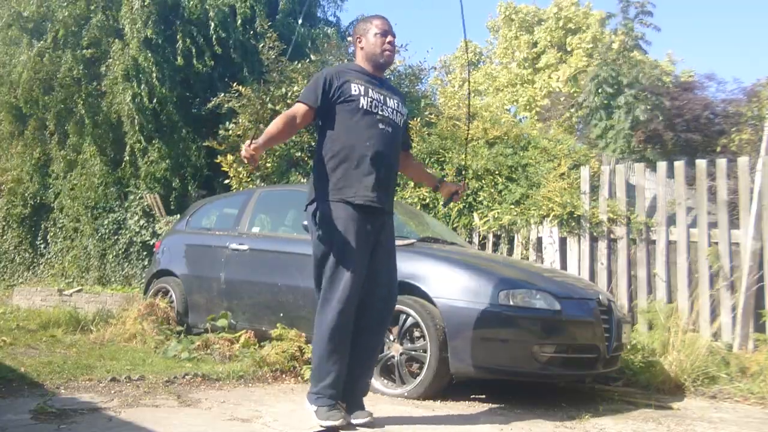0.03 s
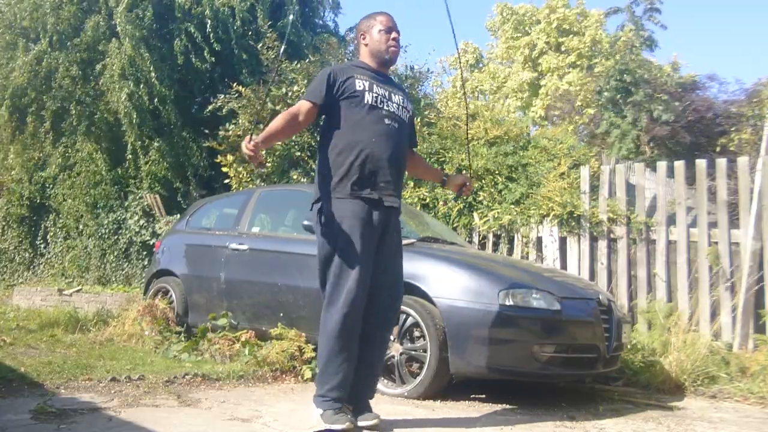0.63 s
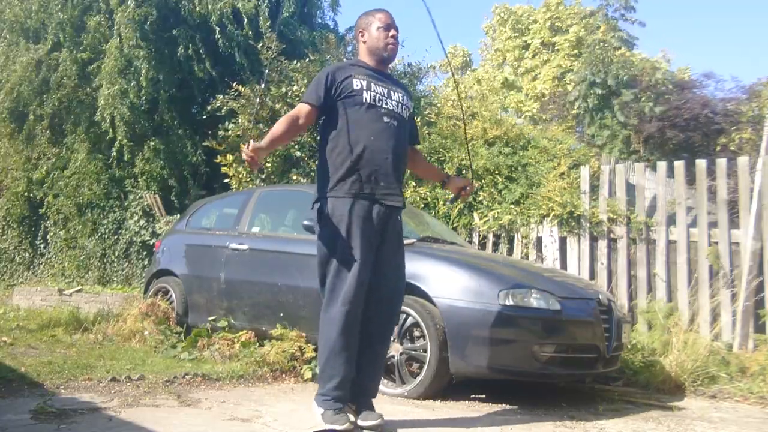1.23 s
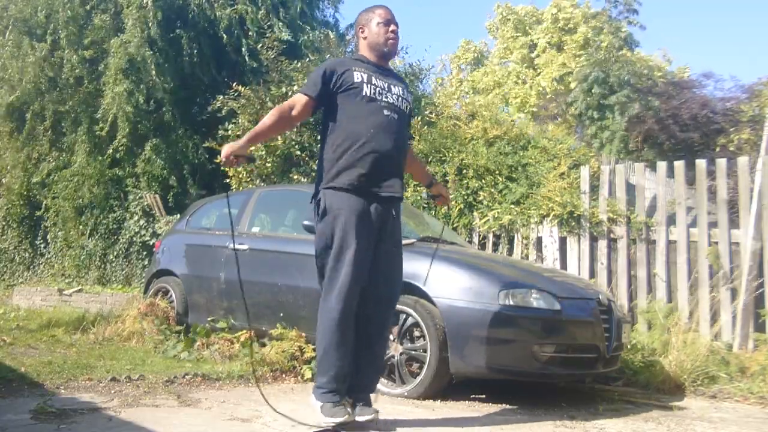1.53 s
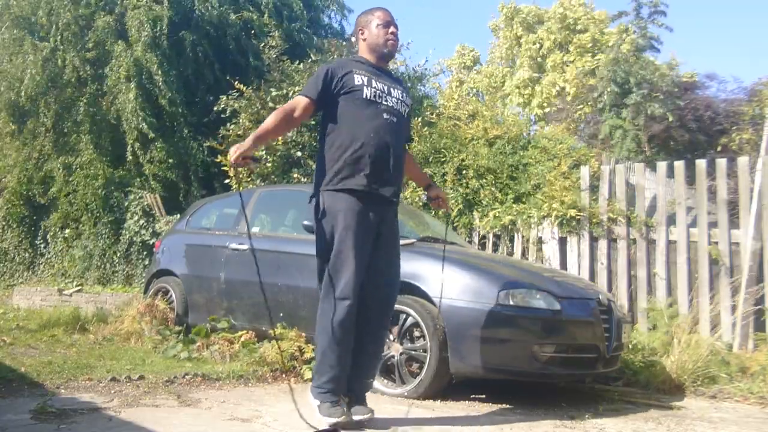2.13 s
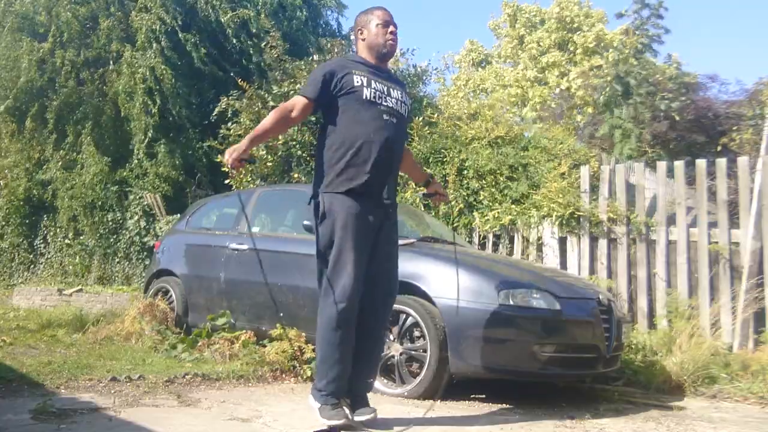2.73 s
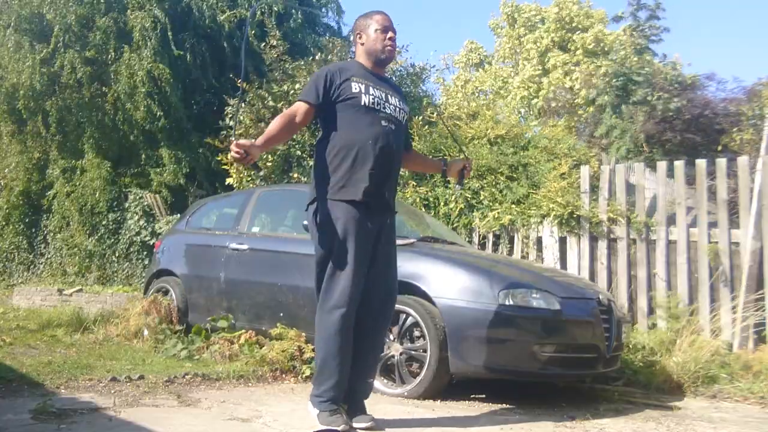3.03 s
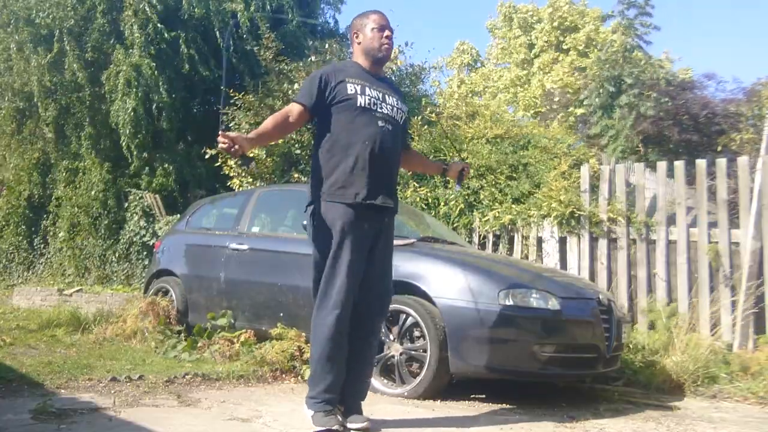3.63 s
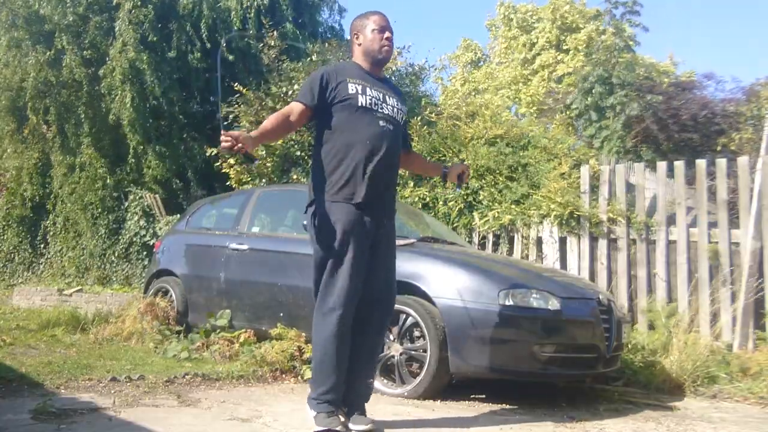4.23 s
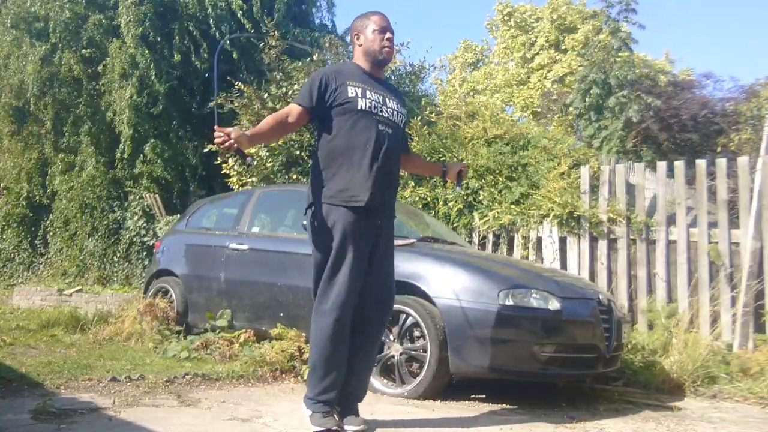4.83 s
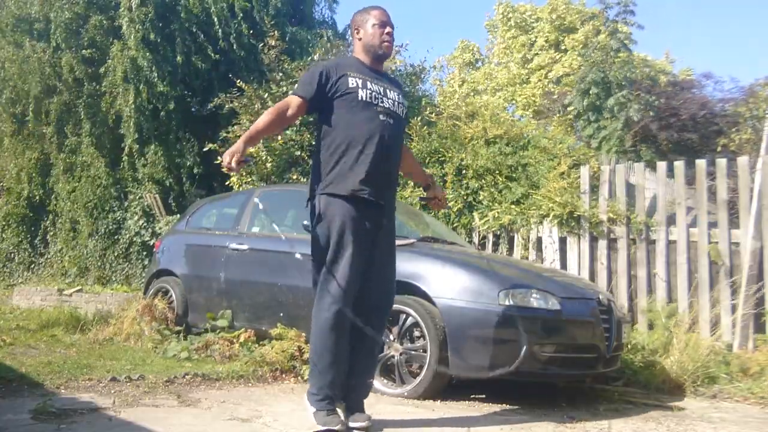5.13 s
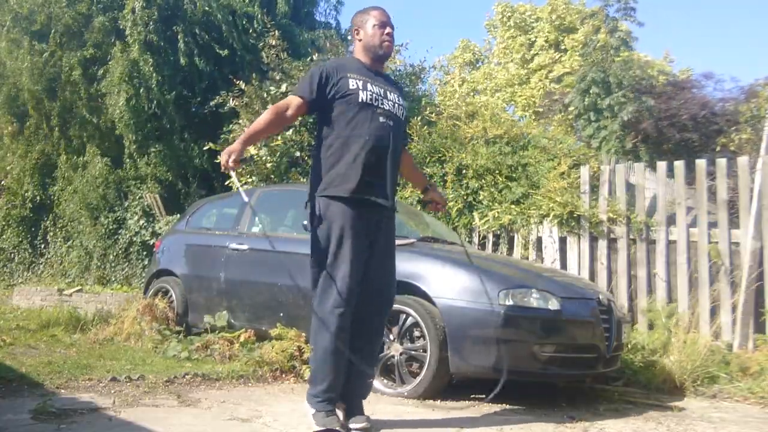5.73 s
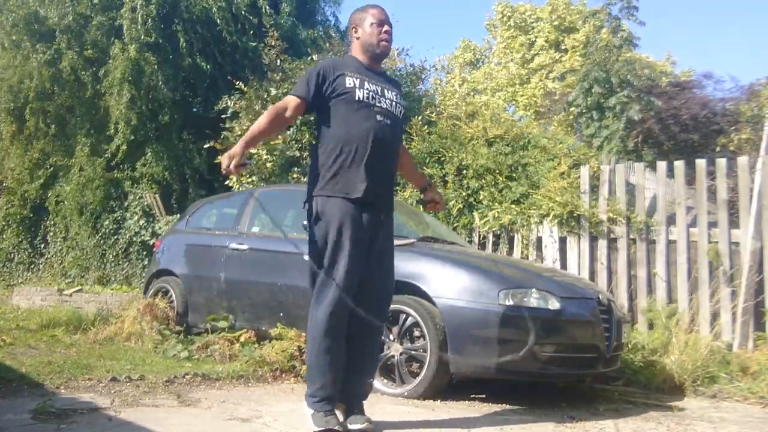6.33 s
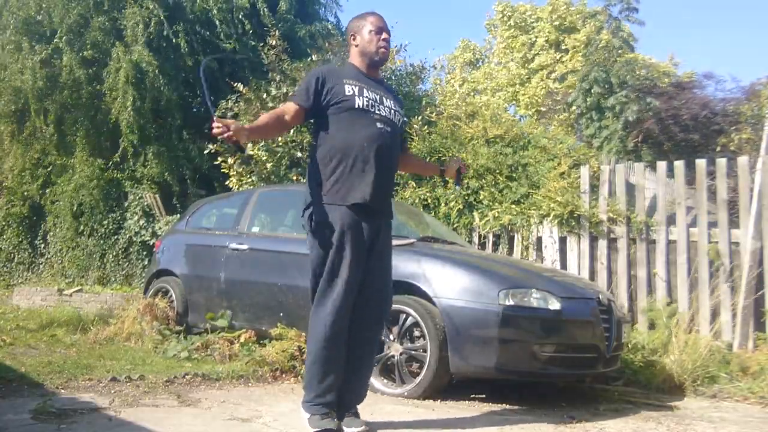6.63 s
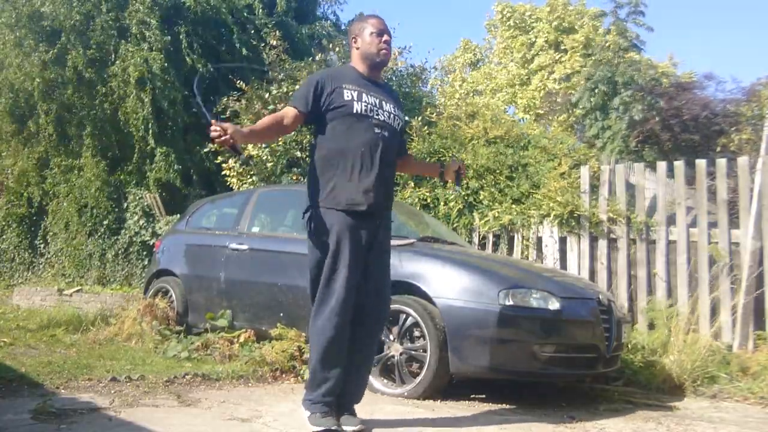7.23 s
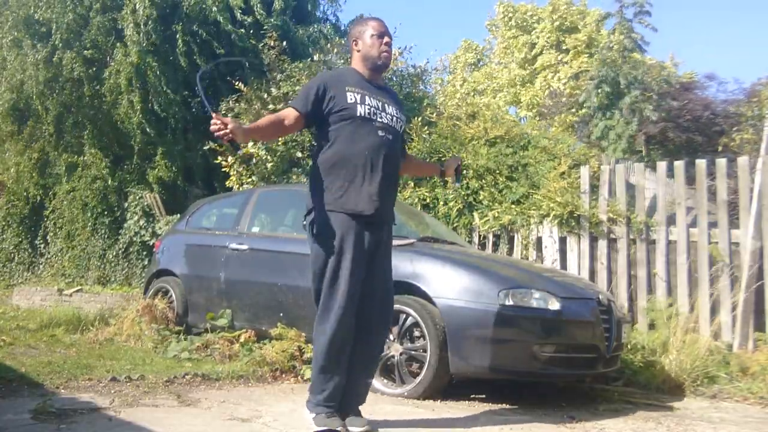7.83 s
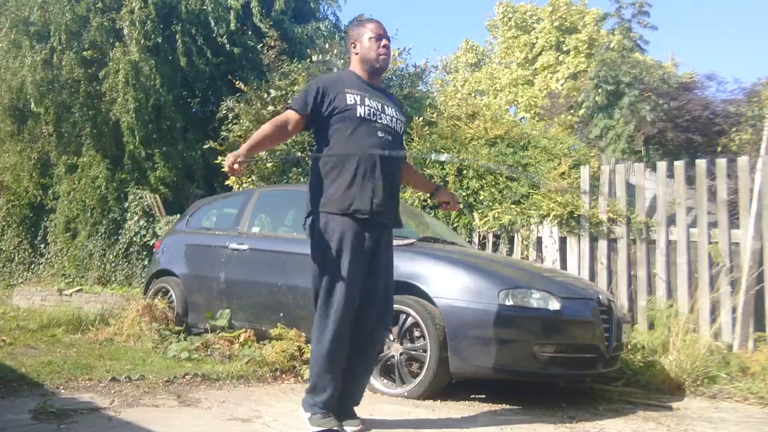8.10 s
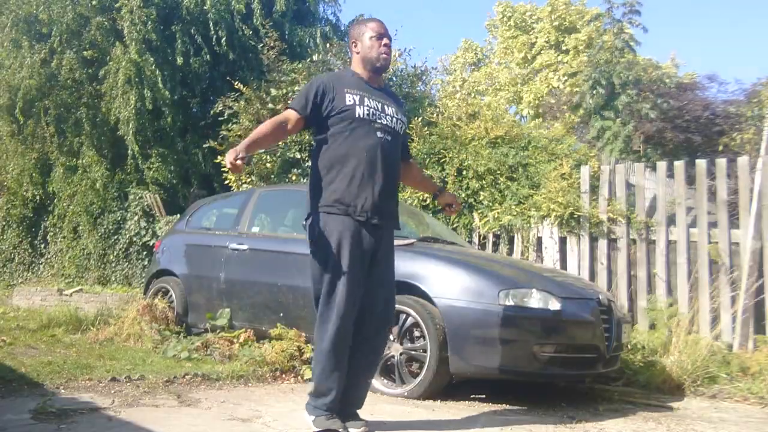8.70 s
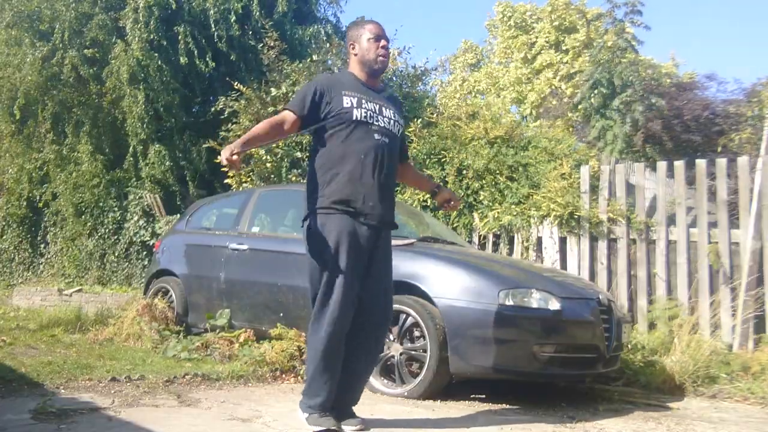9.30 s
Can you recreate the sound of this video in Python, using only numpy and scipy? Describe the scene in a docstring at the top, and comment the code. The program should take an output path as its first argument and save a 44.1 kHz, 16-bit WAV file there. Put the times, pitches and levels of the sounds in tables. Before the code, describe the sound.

A skipping rope hums and slaps paving at a steady pace outdoors, with soft shoe landings and gusts rumbling on the microphone.

```python
"""Someone skips rope on garden paving. At the start a gust buffets the microphone's right port.
From 0.56 s the cord cracks down every 0.6 s: it hums through the air, slaps, then shoes land and
push off, all echoed by walls and a fence. Near 4.5 s a handle swivel chirps and wind hits the left
port, near 6.5 s the right. From 8 s the swivel chirps on three turns as the hiss of leaves fades."""
import sys
import numpy as np
from scipy import signal
from scipy.fft import rfft, irfft
from scipy.io import wavfile

SR = 44100
rng = np.random.default_rng(int(sys.argv[2]) if len(sys.argv) > 2 else 0)


def put_to_file(sound):
    """Save the sound as 16-bit audio at rate SR, in the file named by the first command-line argument."""
    columns = np.atleast_2d(sound).T  # one column per channel
    safe = np.clip(columns, -1, 1)
    whole_steps = np.round(safe * 32767)
    wavfile.write(sys.argv[1], SR, whole_steps.astype(np.int16))


N = 417186
TIME = np.arange(N) / SR
AGE = TIME[:SR // 4]   # s since a contact


def cord_slaps():
    """The loop's tip cracks down, flicking sand; the rest of the cord lands on the grit and skitters."""
    # strikes and rebounds: t/s, relative level/dB, sand trim/dB, laying trim/dB, crack f/Hz
    strikes = [(0.5611, -30.5, -18, -3, 2660), (1.1874, -32, -12.5, -7, 2540),
               (1.795, -27.5, -10.5, -5, 2770), (2.412, -28, -15.5, -4.5, 2740),
               (3.0477, -34.5, -21, -10, 2150), (3.656, -30, -13, -6, 2350), (4.275, -32.5, -14.5, 1, 2796),
               (4.8711, -31.5, -10, 1, 2702), (5.4747, -30.5, -13, -9, 2790),
               (6.062, -31, -12.5, 1.5, 2550), (6.6816, -34, -14, -2, 2600), (7.2949, -29, -14, 0, 2615),
               (7.3325, -44, -6.5, -15, 2715), (7.889, -33.5, -16, -4, 2620), (7.9338, -38, -14, -22, 2700),
               (8.495, -27, -17, -1, 2780), (8.5317, -48, -15, -15, 2297), (9.111, -30, -23.5, 1.5, 2748),
               (9.15, -45, -12.5, -15, 2500)]
    # spectra of tip, dragging cord and sand: f/Hz, gain/dB
    crack_spectrum = [(200, -8), (800, -8), (1400, -7), (2100, 0), (2700, 4.5), (3400, -2), (4800, -8.5),
                      (8000, -22), (16000, -58)]
    drag_spectrum = [(300, -4), (1200, -11), (2400, -17.5), (3900, 1), (4900, -2.5), (5800, -2),
                     (8000, -18), (16000, -27)]
    spray_spectrum = [(1000, -40), (3000, 2.5), (4500, 7), (6000, 10), (10500, 9), (16000, 12)]
    spectrum_peak_hz = 2700
    crack, drag, spray = np.zeros((3, 2, N))
    for s, db, sand_db, laying_db, crack_hz in strikes:
        tip = from_db(-10.5) * burst(rise_s=.002, t60_s=.0065, grain_db=-6.5)
        tip[round(.0018 * SR)] += 1   # the blow itself
        timbre = [(hz * crack_hz / spectrum_peak_hz, gain_db) for hz, gain_db in crack_spectrum]
        add(crack, s - .001, from_db(db + 21.5) * colour(wall_echoes(tip), timbre))
        skitter = from_db(-20) * burst(rise_s=.04, t60_s=.12, grain_db=4)
        laying = from_db(laying_db) * burst(rise_s=.0011, t60_s=.065, grain_db=3.5)
        add(drag, s + .001056, from_db(db + 21) * wall_echoes(laying + skitter))
        sand = tip + from_db(-3) * burst(rise_s=.0046, t60_s=.032, grain_db=10)
        add(spray, s - .0009, from_db(db + sand_db + 24.5) * wall_echoes(sand))
    return crack + colour(drag, drag_spectrum) + colour(spray, spray_spectrum)


def cord_whirl():
    """The cord swishes over the head, down to the ground and up behind the heels."""
    # turns: ground t/s, overhead level/dB, downswing level/dB, f/Hz, upswing level/dB, f/Hz
    turns = [(-.05, -52, -41, 299.4, -50, 290), (.561, -54.5, -46.5, 312.4, -47, 297.3),
             (1.187, -51.5, -47.5, 298, -45.5, 278.2), (1.795, -63, -46, 302, -42, 308.7),
             (2.411, -54.5, -47.5, 330.3, -48, 305), (3.047, -54.5, -43.5, 295, -48, 284.7),
             (3.656, -48.5, -45.5, 342, -44.5, 311.9), (4.275, -54.5, -45, 315.3, -48, 318.7),
             (4.871, -55, -46, 333.5, -44, 320), (5.474, -53.5, -46.5, 291.8, -42.5, 290),
             (6.062, -50, -48, 297.5, -41.5, 313), (6.681, -58, -48.5, 295, -45, 284.6),
             (7.295, -60, -48, 298.4, -45, 310.5), (7.889, -54, -50.5, 291.6, -44, 305),
             (8.495, -50.5, -50.5, 272.6, -41.5, 317), (9.109, -53, -48.5, 270, -44.5, 301)]
    # stroke shapes: fastest t re ground/s, build/s, die/s, width of pitch rise re swell
    overhead = (-.178, .06, .05, .8)
    downswing = (0.016, .115, .085, .52)
    upswing = (.122, .03, 0.05, .7)
    ground_s, over_db, down_db, down_hz, up_db, up_hz = np.transpose(turns)
    over_hz = np.full(len(turns), 267)
    strokes = [surge(ground_s, over_db, over_hz, overhead),
               surge(ground_s, down_db, down_hz, downswing),
               surge(ground_s, up_db, up_hz, upswing)]
    return sum(eddy_tone(pitch_hz, gain) for pitch_hz, gain in strokes)


def surge(ground_s, db, peak_hz, shape, coasting_hz=230.3):
    """One stroke of every turn: pitch and gain rise and sink with the cord's speed."""
    offset_s, build_s, die_s, pitch_share = shape
    fastest_s = ground_s + offset_s
    turn = np.searchsorted((fastest_s[:-1] + fastest_s[1:]) / 2, TIME)
    since_s = TIME - fastest_s[turn]
    away = since_s / np.where(since_s < 0, build_s, die_s)
    pitch_hz = coasting_hz + (peak_hz[turn] - coasting_hz) / (1 + (away / pitch_share) ** 2)
    return pitch_hz, from_db(db)[turn] * np.exp(-away ** 2)


def eddy_tone(pitch_hz, gain):
    """Eddies peel off the cord: a wavering tone from the tip, a wider band from the slower sides."""
    phase = 2 * np.pi * np.cumsum(pitch_hz * (1 + .01843 * drift(rate_hz=14))) / SR
    sine, cosine = np.sin(phase), np.cos(phase)
    tip = sine * from_db(2.4 * drift(rate_hz=15.7))
    sides = drift(rate_hz=45) * sine + drift(rate_hz=43.3) * cosine
    turbulence = from_db(-2.5 + 6 * (np.clip(pitch_hz, 220, 340) / 270 - 1))   # grows with speed
    hum = gain * rms_one(tip + turbulence * sides)
    reflections = drift(rate_hz=30) * cosine * gain * from_db(-18.5)
    return hum * from_db([[1], [-1]]) + reflections * [[1], [-1]]


def shoes():
    """Soles pat the paving and crunch grit, on landing and again on push-off."""
    # footfalls: t/s, relative level/dB, thud trim/dB
    footfalls = [(0.0559, -40, -9), (0.3555, -46, -0.5), (0.6789, -39.5, -8), (0.9623, -48.5, -0.5),
                 (1.2795, -39, -5.5), (1.5831, -41, -14), (1.9057, -42.5, -1), (2.1915, -46, -11),
                 (2.5076, -38.5, -5), (2.8051, -50, 5), (3.1242, -42.5, -6), (3.414, -46, -5.5),
                 (3.735, -40, -4.5), (4.0124, -44, -16), (4.343, -38, -4), (4.6319, -46.5, -1),
                 (4.9558, -37, -10), (5.2393, -43, -5), (5.5676, -45.5, 0), (5.8446, -43, -10),
                 (6.1592, -41.5, -3.5), (6.7643, -40, -7.5), (7.05, -45.5, -19), (7.3761, -40, -4.5),
                 (7.668, -45.5, 1), (7.996, -42, -12), (8.2874, -46.5, -1.5), (8.6021, -44, 1.5),
                 (8.8954, -49.5, 0), (9.2067, -41.5, -3.5)]
    # spectra of grit and sole: f/Hz, gain/dB
    grit_spectrum = [(60, -11.5), (300, 4.5), (1000, 1.5), (2000, -1), (3500, -5.5), (5000, -12.5),
                     (16000, -19.5)]
    sole_spectrum = [(40, -15), (120, -15), (250, -9), (420, -0.5), (560, -0.5), (900, -9), (1500, -31.5),
                     (4000, -67)]
    grit, sole = np.zeros((2, 2, N))
    for s, db, thud_db in footfalls:
        crunch = burst(rise_s=.00055, t60_s=.026, grain_db=.5)
        crunch[round(.0005 * SR)] += from_db(-1.5)
        add(grit, s, from_db(db + 21.5) * wall_echoes(crunch))
        pat = burst(rise_s=.0008, t60_s=.051, grain_db=2)
        pat[round(.001 * SR)] += 1
        add(sole, s, from_db(db + thud_db + 36) * wall_echoes(pat))
    return colour(grit, grit_spectrum) + colour(sole, sole_spectrum)


def swivels():
    """A handle's bearing rubs briefly and rings very high."""
    # rubs: t/s, level/dB
    chirps = [(4.435, -45.5), (8.015, -44), (8.622, -49), (9.233, -44)]
    # bearing modes: f/Hz, level/dB, t60/s
    modes = [(9300, -5, .006), (10950, -3, 0.0092)]
    rubs = np.zeros(N)
    for s, db in chirps:
        add(rubs, s, from_db(db) * burst(rise_s=.004, t60_s=.043, grain_db=14))
    ring = sum(from_db(db - 60 * AGE / t60_s) * np.sin(2 * np.pi * hz * AGE) for hz, db, t60_s in modes)
    return signal.oaconvolve(rubs, ring)[:N]


def wind():
    """Each port has its own lumpy rumble; strong eddies thump on it and break up into flutter."""
    # eddy hits: t/s, relative level/dB, flutter trim/dB, left-right/dB
    buffets = [(0.055, -21, -12.5, -26), (.106, -20, -19, -29), (.149, -13.5, -11, -40),
               (.164, -14.5, -10, -42), (.184, -27, -2.5, -38), (.207, -22.5, -22, -35),
               (.262, -23, -11.5, -36), (.334, -26.5, -24, -37), (3.796, -32.5, -39, -5),
               (4.527, -15, -21.5, 43), (4.547, -17.5, -6.5, 42), (6.335, -29.5, -10.5, -23),
               (6.410, -16.5, -28.5, -34), (6.457, -15.5, -3, -30), (6.477, -32, -3.5, -32),
               (6.521, -20, -27, -24), (6.545, -22.5, -11.5, -29), (6.557, -16, -34, -28),
               (6.609, -23, -12.5, -29), (6.764, -21.5, -20, -25), (7.093, -30, -28, -15)]
    # spectra of wind on a port: f/Hz, gain/dB
    rumble_spectrum = [(20, -25), (50, -2), (100, 3), (180, -7), (300, -9), (500, -29), (1000, -42),
                       (2500, -79)]
    thump_spectrum = [(20, -39), (50, -6.5), (110, 4), (250, 0.5), (450, -11), (800, -26.5), (2000, -89.5)]
    flutter_spectrum = [(150, -7), (450, 7.5), (780, -1), (1100, -9.5), (1600, -25), (2200, -32.5),
                        (3000, -60)]
    lumps_db = 5 * np.array([drift(rate_hz=15.8) for port in range(2)])
    rumble = rms_one(colour(rng.standard_normal((2, N)), rumble_spectrum))
    rumble *= airflow() * from_db(lumps_db)
    thumps, flutters = np.zeros((2, 2, N))
    for s, db, flutter_db, pan_db in buffets:
        ports = at_ports(db, pan_db)
        add(thumps, s + .0012, from_db(38.5) * ports * jolts(per_s=220, t60_s=.11))
        add(flutters, s + .00053, from_db(flutter_db + 33.5) * ports * jolts(per_s=200, t60_s=.11))
    return rumble + colour(thumps, thump_spectrum) + colour(flutters, flutter_spectrum)


def airflow(breeze_db=-73.5, fall_db=14, rise_share=.49):
    """Wind strength at each port: gusts build and die over a light breeze."""
    # gusts: peak t/s, level/dB, length at fall_db below peak/s, left-right/dB
    gusts = [(0.156, -35, 0.75, -30), (0.486, -37, 0.28, 6), (0.768, -42, 0.076, -22),
             (2.145, -51, 0.35, 8), (2.597, -45, 0.2, 29), (3.357, -48.5, 0.1, 21), (4.02, -52, 0.14, -12),
             (4.401, -38, 0.083, 22), (4.55, -35.5, 0.15, 35), (4.7, -44.5, 0.14, -10),
             (4.983, -45, 0.17, -3), (5.172, -49, .12, 21), (5.979, -55, 0.28, -19),
             (6.551, -34.5, 0.91, -30.5), (7.06, -40.5, 0.44, -7), (7.4, -38.5, .25, -10),
             (7.95, -45, .55, -7), (8.335, -50, 0.23, -17), (8.705, -46, 0.23, 20), (8.924, -47, .2, -20),
             (9.21, -50, 0.38, -25)]
    power = np.full((2, N), from_db(breeze_db) ** 2)
    for s, db, length_s, pan_db in gusts:
        near = slice(*np.searchsorted(TIME, [s - 2 * length_s, s + 2 * length_s]))
        since_s = TIME[near] - s
        away = np.maximum(-since_s / rise_share, since_s / (1 - rise_share)) / length_s
        power[:, near] += (at_ports(db, pan_db) * from_db(-fall_db * away)) ** 2
    return np.sqrt(power)


def jolts(per_s, t60_s):
    """One pressure jolt, then a dying run at random moments; energy 1."""
    hits = rng.random(len(AGE)) < per_s / SR
    run = hits * rng.uniform(.26, 1, len(AGE)) * from_db(-60 * AGE / t60_s)
    run[0] = 1
    return run * rng.choice([-1, 1], len(AGE)) / np.linalg.norm(run)


def wall_echoes(sound):
    """A contact at both ports: direct path, hard echoes that vary from spot to spot, dense scatter."""
    # echoes off ground, walls and fence: delay/s, level/dB
    echoes = [(.0005, -8), (.0039, -10), (.0055, -8.5), (.0068, -24), (0.0105, -8), (0.0378, -20)]
    response = np.zeros((2, len(AGE)))
    response[0, 0] = response[1, 2] = 1   # left port first
    for port in response:
        for delay_s, db in echoes:
            port[round(abs(delay_s + rng.normal(0, .00015)) * SR)] += from_db(db)
    heard = signal.fftconvolve(response, sound[None], axes=-1)
    for port in heard:
        scatter = burst(rise_s=.0009, t60_s=.1, grain_db=0)
        add(port, .0035, from_db(-3) * np.linalg.norm(sound) * scatter)
    return from_db([[.8], [-.8]]) * heard


def garden_reverb(x):
    """Hedges and trees add a faint, dull, diffuse tail."""
    tails = np.array([burst(rise_s=.01, t60_s=.37, grain_db=4) for port in x])
    tails = signal.sosfilt(signal.butter(1, 6000, fs=SR, output="sos"), tails)
    return x + from_db(-10.5) * signal.oaconvolve(x, tails, axes=-1)[:, :N]


def leaves_and_air():
    """Leaves hiss all around, over a dull far-off murmur of air."""
    # rustle envelope: t/s, relative level/dB
    envelope = [(0, -63), (.3, -69), (.9, -64), (2.0, -61), (3.1, -60.5), (4.2, -64.5), (5.5, -68),
                (7.0, -68), (8.2, -74), (9.46, -75.5)]
    # spectra of leaves and distant air: f/Hz, gain/dB
    rustle_spectrum = [(200, 5.5), (600, 6.5), (1200, 0), (2500, -0.5), (4500, 0.5), (10000, -3),
                       (16000, 2.5)]
    murmur_spectrum = [(20, -12), (70, -1), (200, 1), (350, -3.5), (600, -8), (1200, -14), (3000, -20),
                       (16000, -44.5)]
    leaves = rms_one(colour(rng.standard_normal((2, N)), rustle_spectrum))
    leaves *= from_db(np.interp(TIME, *np.transpose(envelope)) + 8.5)
    air = rng.standard_normal((2, N)) + .55 * rng.standard_normal(N)   # partly common to both ports
    murmur = from_db(-59.5) * rms_one(colour(air, murmur_spectrum))
    return (leaves + murmur) * from_db([[.6], [-.6]])


def burst(rise_s, t60_s, grain_db):
    """A swelling, dying shower of tiny uneven contacts; energy 1."""
    grains = rng.standard_normal(len(AGE)) * from_db(grain_db * rng.standard_normal(len(AGE)))
    shower = grains * (1 - np.exp(-AGE / rise_s)) * from_db(-60 * AGE / t60_s)
    return shower / np.linalg.norm(shower)


def drift(rate_hz, hop=20):
    """Smooth random wander, rms 1."""
    slow_sr = SR // hop
    lowpass = signal.butter(2, rate_hz, fs=slow_sr, output="sos")
    slow = signal.sosfilt(lowpass, rng.standard_normal(N // hop + slow_sr))[slow_sr:]
    return np.interp(TIME, np.arange(len(slow)) / slow_sr, rms_one(slow))


def colour(x, spectrum, size=8192):
    """Minimum-phase filter with the given spectrum."""
    hz, db = np.transpose(spectrum)
    grid_hz = np.maximum(np.fft.rfftfreq(size, 1 / SR), 1)
    gain = from_db(np.interp(np.log(grid_hz), np.log(hz), db))
    cepstrum = irfft(np.log(gain))
    cepstrum[1:size // 2] *= 2
    cepstrum[size // 2 + 1:] = 0
    response = irfft(np.exp(rfft(cepstrum)))[:size // 2]
    return signal.oaconvolve(np.atleast_2d(x), response[None], axes=-1)[:, :N]


def at_ports(db, pan_db):
    """Split a level between left and right at constant power."""
    ports = from_db([[pan_db / 2], [-pan_db / 2]])
    return from_db(db) * ports / np.linalg.norm(ports)


def add(track, s, sound):
    start = max(round(s * SR), 0)
    track[..., start:start + sound.shape[-1]] += sound[..., :N - start]


def from_db(db):
    return 10 ** (np.asarray(db) / 20)


def rms_one(x):
    return x / np.sqrt(np.mean(x ** 2) + 1e-20)


def scene():
    contacts = cord_slaps() + shoes() + swivels()
    return garden_reverb(contacts) + cord_whirl() + wind() + leaves_and_air()


def record(dry, cutoff_hz=16100):
    """The microphone is dull above 5 kHz; the top is cut."""
    # microphone response: f/Hz, gain/dB
    microphone = [(20, 6.5), (4300, 0.5), (4900, -1), (5550, -20.5), (6800, -13.5), (8400, -16),
                  (10300, -7.5), (12500, -13.5), (15500, -14), (16500, -23)]
    lowpass = signal.ellip(10, .2, 80, cutoff_hz, fs=SR, output="sos")
    return signal.sosfilt(lowpass, colour(dry, microphone))


dry = scene()
out = record(dry)
put_to_file(out)
```